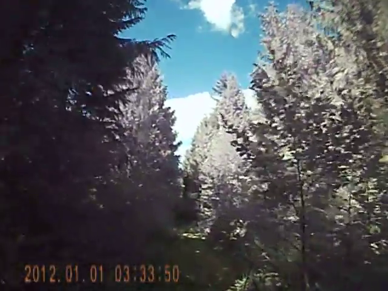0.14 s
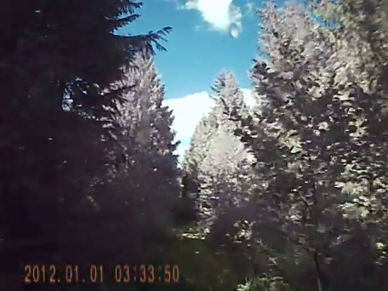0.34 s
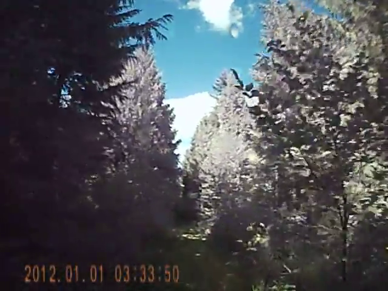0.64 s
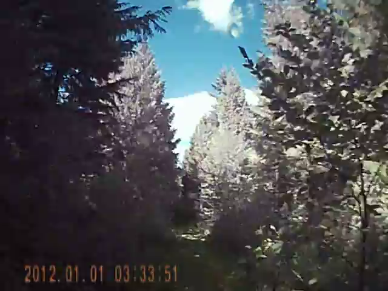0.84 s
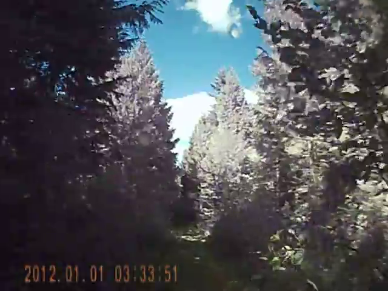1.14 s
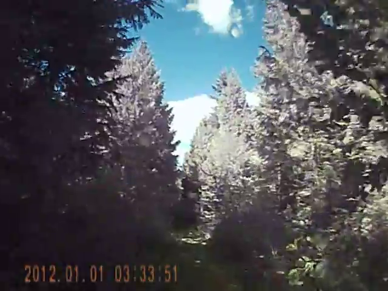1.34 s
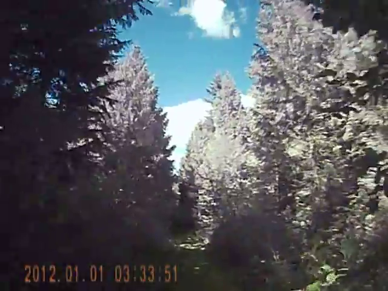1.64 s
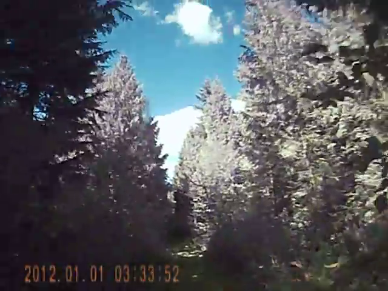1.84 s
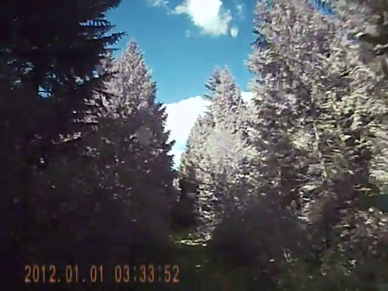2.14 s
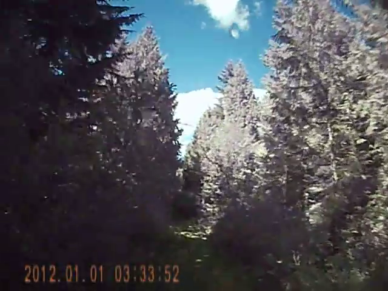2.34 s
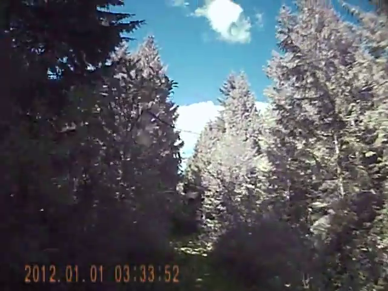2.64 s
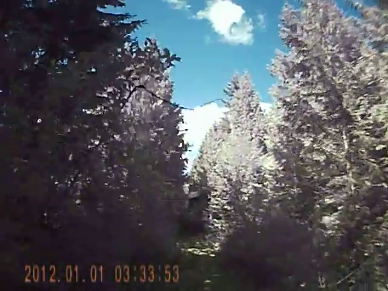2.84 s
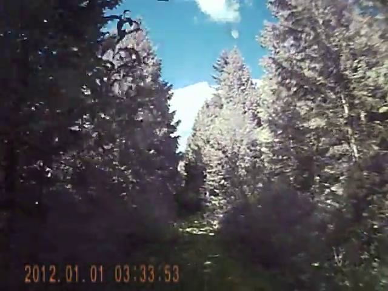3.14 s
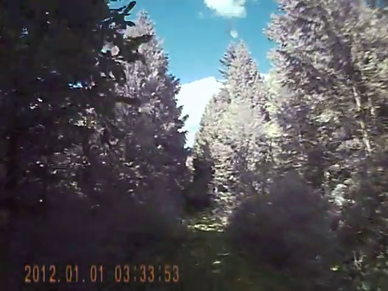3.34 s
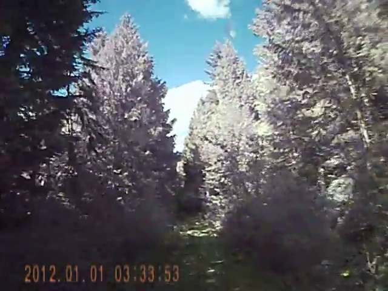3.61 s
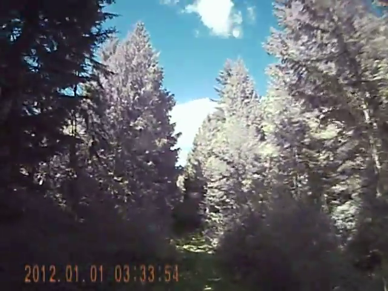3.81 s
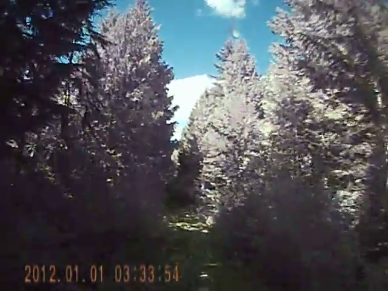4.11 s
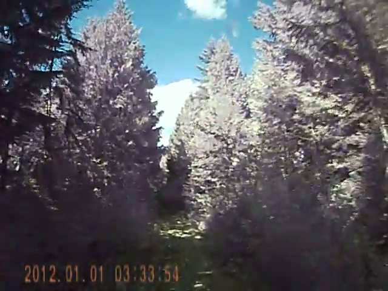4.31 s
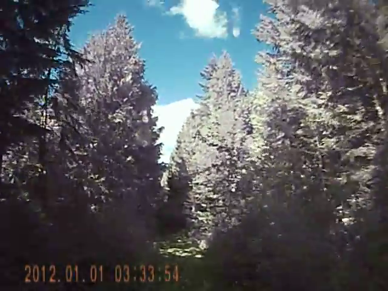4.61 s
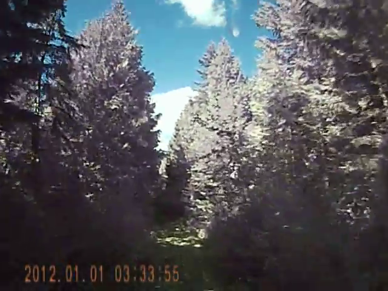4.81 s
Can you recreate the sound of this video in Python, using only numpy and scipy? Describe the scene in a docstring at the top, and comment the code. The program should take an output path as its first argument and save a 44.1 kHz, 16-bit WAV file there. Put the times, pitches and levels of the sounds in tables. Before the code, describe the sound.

A truck grinds along an overgrown track, its deep engine drone climbing while branches crack, slap and scrape the body ever harder.

```python
"""A four-wheel-drive truck pulls along an overgrown forest track in low gear, heard from the cab.
It opens on a deep engine drone with shudder and leaf crackle; a flurry of twigs cracks as the drone climbs.
A faint whine passes, then limbs slap harder; from three seconds on, ruts and bumps thump and lurch the body,
and near the end boughs groan along the side under the loudest cracks. Pulses, shaped noise and ringing
modes make these layers; a small dashboard camera overloads on all of it."""
import sys
import numpy as np
from scipy import signal
from scipy.fft import rfft, irfft, next_fast_len
from scipy.io import wavfile
from scipy.ndimage import map_coordinates

SR = 44100
rng = np.random.default_rng(int(sys.argv[2]) if len(sys.argv) > 2 else 0)


def put_to_file(sound):
    """Save the sound as 16-bit audio at rate SR, in the file named by the first command-line argument."""
    columns = np.atleast_2d(sound).T  # one column per channel
    safe = np.clip(columns, -1, 1)
    whole_steps = np.round(safe * 32767)
    wavfile.write(sys.argv[1], SR, whole_steps.astype(np.int16))


N = 219132


def amp(db):
    """Decibels to gain."""
    return 10 ** (np.asarray(db) / 20)


def unit(x):
    """Scale to rms 1."""
    return x / np.sqrt(np.mean(x ** 2) + 1e-20)


def curves(rows):
    """One value per sample for each column after the time."""
    s, *columns = np.transpose(rows)
    return [np.interp(np.arange(N) / SR, s, column) for column in columns]


def wobble(rate):
    """A smooth random curve, rate knots a second."""
    knots = rng.standard_normal(int(N * rate / SR) + 4)
    return map_coordinates(knots, [np.arange(N) * rate / SR])


def filtered(x, response):
    """x times a complex response of frequency."""
    size = next_fast_len(N + SR // 2)
    spectrum = rfft(x, size) * response(np.fft.rfftfreq(size, 1 / SR))
    return irfft(spectrum, size)[:N]


def coloured(x, points):
    """x through a causal minimum-phase filter of unit power gain, shaped by (f/Hz, level/dB) points."""
    size = 2 ** 14
    f, db = np.transpose(points)
    log_f = np.log(np.fft.rfftfreq(size, 1 / SR) + 1)
    cepstrum = irfft(np.log(amp(np.interp(log_f, np.log(f), db))))
    # folding the cepstrum forward makes the filter causal
    cepstrum[1:size // 2] *= 2
    cepstrum[size // 2 + 1:] = 0
    ring = irfft(np.exp(rfft(cepstrum)))
    return signal.fftconvolve(x, ring / np.linalg.norm(ring))[:N]


def grains(rate, spread_db):
    """Random tiny impacts of uneven size, rate a second on average, rms 1."""
    hit = rng.random(N) < rate / SR
    sign = rng.choice([-1, 1], N)
    return unit(hit * sign * amp(spread_db * rng.standard_normal(N)))


def add(track, s, sound):
    """Mix a sound into the track at time s."""
    room = track[max(round(s * SR), 0):][:len(sound)]
    room += sound[:len(room)]


def burst(noise, envelope):
    """A random stretch of the noise under an envelope, at a set strength."""
    piece = noise[rng.integers(N - len(envelope)):][:len(envelope)] * envelope
    return piece * np.linalg.norm(envelope) / np.linalg.norm(piece)


def swell(events, half_s):
    """Gain that peaks just after each (t/s, level/dB) event; overlapping swells add in power."""
    t = np.arange(N) / SR
    power = sum(amp(db) ** 2 * np.exp(-2 * ((t - s - 0.44 * half_s) / half_s) ** 2) for s, db, *_ in events)
    return np.sqrt(power)


def whine():
    """A faint wavering whine, perhaps from the gears: a phase-wobbled sine that fades in and out."""
    middle_s, half_length_s, level_db, pitch_hz = 1.91, 0.22, -29.5, 669
    t = np.arange(N) / SR
    level = amp(level_db + 2 * wobble(25)) * np.exp(-((t - middle_s) / half_length_s) ** 4)
    return np.sqrt(2) * level * np.sin(2 * np.pi * pitch_hz * t + 1.6 * wobble(40))


# strength of the wheels hopping on their tyres: t/s, level/dB
WHEEL_HOP = [(0, -25.5), (.25, -17), (1.05, -26), (1.9, -25.5), (2.25, -18), (3.5, -20.5), (3.75, -16),
             (4.5, -16.5), (4.97, -20)]


def wheels():
    """Wheel hop shakes the whole cab with a slow, narrow-band shudder."""
    centre_hz, width_hz = 14.34, 5.6
    hop_db, = curves(WHEEL_HOP)
    shudder = filtered(rng.standard_normal(N), lambda hz: np.exp(-((hz - centre_hz) / width_hz) ** 2))
    return amp(hop_db) * unit(shudder)


# roughness of the ground, which drives boom and sway: t/s, level/dB
GROUND_ROUGHNESS = [(0.0, -28), (0.25, -25), (1.11, -23.5), (3.29, -19.5), (3.82, -21.5), (4.12, -17.5),
                    (4.5, -11.5), (4.97, -18.5)]
# wheels drop into ruts: t/s, push level/dB
RUT_DROPS = [(3.203, -8.5), (3.735, -2), (3.882, -3), (3.9, -3), (3.937, -5.5), (4.146, -3)]
# spectrum of the body swaying on its springs: f/Hz, relative level/dB
SWAY_SPECTRUM = [(8, -28), (18, -5), (28, 0), (45, 1), (75, -12.5), (130, -20.5), (300, -63)]
# spectrum of the boom in the cab: f/Hz, relative level/dB
CAB_SPECTRUM = [(40, -12), (80, -6), (130, 1.5), (200, -5.5), (280, -2.5), (400, -5), (600, -12),
                (1200, -22.5), (3000, -75.5)]


def chassis():
    """The body sways on its springs, booms over rough ground and lurches into ruts."""
    sway_db, boom_db = -2, 0.42  # relative to the ground's roughness
    jolt_sway_db, jolt_sway_s = -13.5, 0.13  # rocking at each bump: level relative to it, half length
    jolt_boom_db, jolt_boom_s = -8, 0.046  # and the cab's rumble
    drop_s = 0.011  # time a wheel takes to drop
    ground_db, = curves(GROUND_ROUGHNESS)
    rocking = np.hypot(amp(ground_db + sway_db), amp(jolt_sway_db) * swell(BUMPS, jolt_sway_s))
    rumbling = np.hypot(amp(ground_db + boom_db), amp(jolt_boom_db) * swell(BUMPS, jolt_boom_s))
    sway = rocking * unit(coloured(rng.standard_normal(N), SWAY_SPECTRUM))
    rumble = unit(coloured(grains(rate=1200, spread_db=2), CAB_SPECTRUM))
    boom = rumbling * amp(1.1 * wobble(16)) * rumble
    lurch = np.zeros(N)
    for s, db in RUT_DROPS:
        add(lurch, s - drop_s, -amp(db) * np.hanning(int(2 * drop_s * SR)))
    return sway + boom + lurch


# bumps jolt the body with a hollow thump: t/s, relative level/dB, strongest mode f/Hz
BUMPS = [(1.098, -11, 353), (2.857, -13, 178.5), (3.54, -5.5, 252.5), (3.633, -5.5, 223.7),
         (3.753, -7.5, 227.7), (3.826, -2, 217.3), (3.907, -4, 237.4), (4.042, -8, 249),
         (4.155, -16.5, 305), (4.21, -11, 347), (4.36, -1, 254.6), (4.46, -10, 239.6), (4.558, -3.5, 289),
         (4.612, -16, 139)]


def thumps():
    """A jolt rings a cluster of three low, well-damped body modes."""
    t = np.arange(SR // 4) / SR
    modes = [(.8, -8), (1, -2.5), (1.45, -11)]  # frequency ratio, level/dB
    envelope = (1 - np.exp(-t / 0.0021)) * amp(-60 * t / 0.13)
    out = np.zeros(N)
    for s, db, hz in BUMPS:
        ring = sum(amp(level) * np.sin(2 * np.pi * (hz * ratio * t + rng.random())) for ratio, level in modes)
        add(out, s, amp(db + 4.0) * ring * envelope)
    return out


# thickness of the undergrowth against the body: t/s, level/dB
UNDERGROWTH = [(0, -32), (.82, -32.5), (1.12, -28.5), (1.45, -29), (1.9, -25), (2.3, -23), (2.85, -22),
               (3.3, -20.5), (3.7, -19.5), (4.33, -14), (4.75, -19), (4.97, -20.5)]


def foliage():
    """How hard greenery presses on the body: the undergrowth plus the leaves of each limb."""
    leaf_db, leaf_s = -11, 0.042  # swish at each limb: level relative to it, half length
    growth_db, = curves(UNDERGROWTH)
    return np.hypot(amp(growth_db), amp(leaf_db) * swell(LIMB_HITS, leaf_s))


# spectrum of leaves sweeping the body: f/Hz, relative level/dB
BRUSH_SPECTRUM = [(150, -29), (400, -6.5), (650, 0), (880, -4.5), (1300, -8.5), (1600, -16), (2050, -18),
                  (2400, -25), (3600, -20), (4300, -17.5)]


def brushwood():
    """Leaves and undergrowth sweep the body: a dense crackle of tiny impacts that comes in clumps."""
    crackle = grains(rate=2500, spread_db=3.5) * amp(0.87 * wobble(45))
    level_db = -0.32  # relative to the foliage
    return amp(level_db) * foliage() * unit(coloured(crackle, BRUSH_SPECTRUM))


# spectrum of small wood snapping or flicking, for sprigs and twigs: f/Hz, relative level/dB
SNAP_SPECTRUM = [(200, -34.5), (700, 1), (1150, 5.5), (1650, -7.5), (2100, 1), (2700, -2.5), (3200, -2.5),
                 (3650, -0.5), (4000, -3.5), (5000, -53)]


def sprigs():
    """Small shoots flick the paint at random in short noise bursts, harder where the foliage is thick."""
    t = np.arange(SR // 50) / SR
    flicks = np.abs(grains(rate=110, spread_db=1.5))
    flick_shape = (1 - np.exp(-t / 0.00054)) * amp(-60 * t / 0.032)
    envelope = signal.fftconvolve(flicks, flick_shape)[:N]
    noise = coloured(rng.standard_normal(N), SNAP_SPECTRUM)
    level_db = -14  # relative to the foliage
    return amp(level_db) * foliage() * unit(envelope * noise)


# boughs rub along the side, first in a short squeak, later in groans:
# t/s, length/s, level/dB, mean slip rate f/Hz
BOUGH_RUBS = [(.925, .025, -17, 615), (4.2, 0.075, -10.5, 350), (4.341, .12, -12.5, 320),
              (4.555, 0.088, -15.5, 365), (4.721, 0.28, -21.5, 330)]
# spectrum of the rubbing: f/Hz, relative level/dB
RUB_SPECTRUM = [(100, -42), (330, 9.5), (460, 10.5), (620, 3), (740, -8), (1000, -4.5), (1330, 4),
                (1650, -20), (3600, -24), (5000, -51.5)]


def bough():
    """Stick and slip at an uneven rate makes a rough groan."""
    attack_s, release_s = 0.01, 0.08  # a bough takes hold; it slides off and fades by 60 dB
    t = np.arange(N) / SR
    out = np.zeros(N)
    for s, length, db, rate in BOUGH_RUBS:
        release = amp(-60 * np.maximum(t - s - length, 0) / release_s)
        grip = np.clip((t - s) / attack_s, 0, 1) * release
        turns = np.cumsum(rate * np.exp(.05 * wobble(40) + .09 * wobble(300))) / SR
        # one pulse a turn, less the average push
        pulses = np.diff(np.floor(turns), prepend=0) - rate / SR
        slips = pulses * amp(2.9 * wobble(120))
        out += amp(db) * grip * unit(coloured(slips, RUB_SPECTRUM))
    return out


# twigs snapping on the body: t/s, relative level/dB
TWIG_SNAPS = [(0.0641, -20), (0.1164, -25.5), (.9145, -21.5), (0.9854, -22), (1.0114, -23.5), (1.0717, -18),
              (1.099, -8.5), (1.126, -9.5), (1.153, -19.5), (1.1836, -11.5), (1.196, -22), (1.21, -9.5),
              (1.2204, -22), (1.2336, -16.5), (1.255, -21.5), (1.3172, -24.5), (1.3397, -22.5),
              (1.352, -25.5), (1.376, -18), (1.423, -17.5), (1.4456, -25), (1.514, -28.5), (1.561, -20),
              (1.6071, -14.5), (1.616, -17), (1.6274, -23), (1.652, -20.5), (1.8128, -30), (2.031, -25.5),
              (2.3223, -14), (2.366, -9), (2.536, -23.5), (2.584, -23), (2.8085, -22), (2.9127, -17),
              (2.9853, -19), (3.007, -16), (3.0961, -6), (3.08, -14), (3.1873, -16), (3.2092, -19),
              (3.238, -19), (3.2634, -17), (3.2853, -11.5), (3.3855, -11.5), (3.8358, -12), (3.8896, -9),
              (3.9077, -5.5), (3.9467, -11.5), (3.9886, -13.5), (4.1393, -14), (4.2628, -21), (4.2848, -11),
              (4.3802, 1.5), (4.4411, -1.5), (4.5254, -15), (4.6219, -12.5)]
# spectrum of a twig knocking on the body: f/Hz, relative level/dB
KNOCK_SPECTRUM = [(100, -29), (340, 1.5), (560, -11), (750, -7.5), (1150, -11), (1600, -24), (4000, -18)]


def twigs():
    """Each twig breaks with a sharp, bright noise crack and a duller knock on the body."""
    t = np.arange(SR // 10) / SR
    bright = coloured(rng.standard_normal(N), SNAP_SPECTRUM)
    dull = coloured(rng.standard_normal(N), KNOCK_SPECTRUM)
    # the fracture is over in a few milliseconds; splintering fibres trail it
    tear = np.exp(-(t / .002) ** 2) + .7 * amp(-60 * t / .025)
    knock = (1 - np.exp(-t / 0.0013)) * amp(-60 * t / 0.046)
    knock_db = 3.5  # relative to the crack
    out = np.zeros(N)
    for s, db in TWIG_SNAPS:
        add(out, s, amp(db) * burst(bright, tear))
        add(out, s, amp(db + knock_db) * burst(dull, knock))
    return out


# limbs slapping and dragging over the panels: t/s, relative level/dB, contact time/s
LIMB_HITS = [(.395, -25.5, 0.0026), (.915, -17, 0.0066), (.941, -16.5, 0.0048), (1.608, -15, 0.0055),
             (2.325, -6, 0.02), (2.366, -9, 0.015), (2.405, -13, 0.01), (2.465, -20, 0.0077),
             (2.532, -15.5, 0.0038), (2.858, -16, 0.0022), (3.04, -4, 0.0075), (3.096, -7.5, 0.023),
             (3.315, -10.5, 0.0034), (3.387, -15, 0.016), (3.42, -19.5, 0.0071), (3.523, 2.5, 0.0029),
             (3.539, -3.5, 0.016), (3.751, -15.5, .022), (3.833, -6.5, 0.0027), (3.91, -5, 0.013),
             (4.029, -8, 0.0056), (4.048, -9.5, .026), (4.09, -1.5, 0.012), (4.157, -12.5, .004),
             (4.204, -21.5, 0.0066), (4.337, -14, .008), (4.356, -11.5, 0.0095), (4.383, -3.5, .011),
             (4.441, -8.5, 0.015), (4.473, -8.5, 0.0087), (4.56, -6.5, 0.0037)]
# resonances of the door and roof panels: f/Hz, width/Hz, relative level/dB
PANEL_MODES = [(549.6, 26, 7.5), (651, 24.6, 6.5), (768.6, 51, 5.5), (997, 26.5, 4), (1227, 70, 1),
               (1716, 230, -11.5), (1942, 68, -5.5), (2970, 1300, -27), (3544, 56, -6), (3896, 500, -10.5)]


def limbs():
    """A limb chatters on the sheet metal while it touches; the panel rings on briefly."""
    t = np.arange(SR // 4) / SR
    force = np.zeros(N)
    for s, db, contact in LIMB_HITS:
        press = (1 - np.exp(-t / 0.00041)) * amp(-60 * np.maximum(t - contact, 0) / 0.061)
        add(force, s, amp(db) * press * rng.standard_normal(len(t)))

    def panel(f):
        """Sum of resonances with alternating sign, scaled to rms gain 1."""
        h = 0
        for k, (centre, width, db) in enumerate(PANEL_MODES):
            damping = 1j * f * width
            h = h + (-1) ** k * amp(db) * damping / (centre * centre - f * f + damping)
        return h / np.sqrt(np.mean(np.abs(h) ** 2))
    return filtered(force * amp(1.6 * wobble(300)), panel)


# the engine gathers speed, then labours in the ruts: t/s, firing rate f/Hz
FIRING_RATE = [(0, 29.6), (.7, 33.11), (1.1, 41.36), (1.65, 44.3), (1.9, 51.06), (2.8, 60.7), (3.22, 56.94),
               (3.55, 61.96), (3.85, 68.5), (4.25, 62), (4.97, 70.6)]
# exhaust harmonics from the firing note upwards, before any cab lift: level/dB
EXHAUST_HARMONICS = [-20.5, -30, -36.5, -38.5, -42]
# resonances of the cab that lift a passing harmonic: f/Hz, width/Hz, lift level/dB
CAB_BOOMS = [(42, 3.7, 4), (82.5, 3.6, 5.5), (101, 3.7, 11), (127.6, 8.1, 3.5), (179.2, 7.7, 8.5)]


def engine():
    """Exhaust pulses drone as a firing note and less steady overtones, lifted by the cab's resonances."""
    hz, = curves(FIRING_RATE)
    phase = 2 * np.pi * np.cumsum(hz) / SR
    out = np.zeros(N)
    for k, db in enumerate(EXHAUST_HARMONICS, 1):
        lift_db = sum(lift * np.exp(-((k * hz - centre) / width) ** 2) for centre, width, lift in CAB_BOOMS)
        flutter_db, drift_rad = (.8, .084) if k == 1 else (1.8, .3)
        level = amp(db + lift_db + flutter_db * wobble(10))
        out += level * np.sin(k * phase + drift_rad * wobble(10))
    return np.sqrt(2) * out


def scene():
    """Everything meets at the dashboard."""
    vehicle = engine() + whine() + wheels() + chassis() + thumps()
    greenery = brushwood() + sprigs() + twigs() + limbs() + bough()
    return (vehicle + greenery)[None]


def record(dry):
    """A narrow-band camera with an off-centre input: downward swings hit the rail first."""
    bias, rail, headroom = -.428, -.71, .72  # fractions of full scale
    margin, top_hz = 0.0004, 15800
    slow = signal.resample_poly(dry[0], 80, 441)  # down to 8 kHz sampling
    rounded = slow / (1 + np.abs(slow / headroom) ** 5) ** (1 / 5)
    clipped = np.maximum(rounded, rail - bias)
    wide = signal.resample_poly(clipped, 441, 80, window=('kaiser', 6))[:N]
    # ripples that overshoot the rail are cut again and spit into the treble
    wide = np.maximum(wide, rail - bias - margin)
    return (filtered(wide, lambda hz: hz < top_hz) + bias)[None]


dry = scene()
out = record(dry)
put_to_file(out)
```